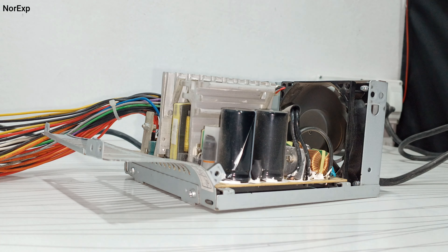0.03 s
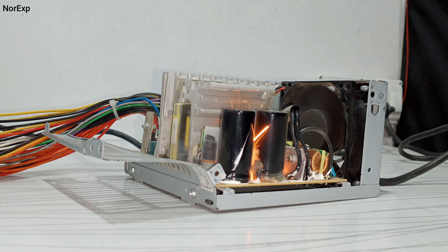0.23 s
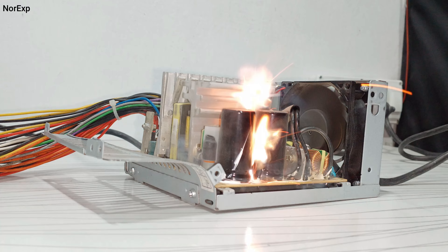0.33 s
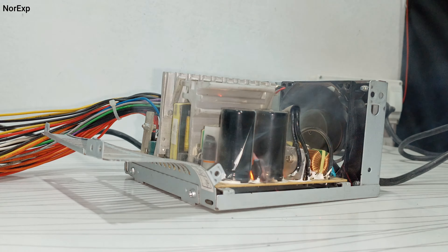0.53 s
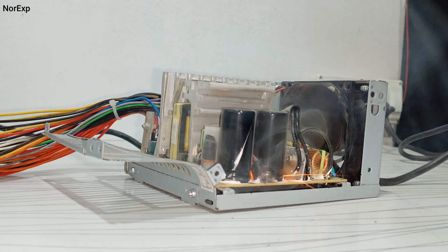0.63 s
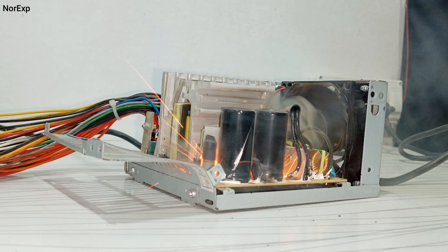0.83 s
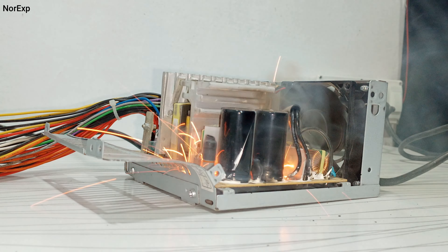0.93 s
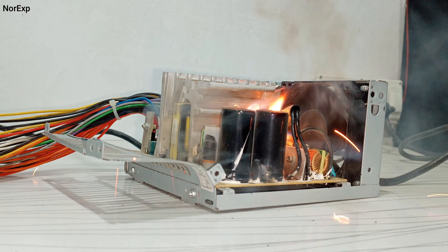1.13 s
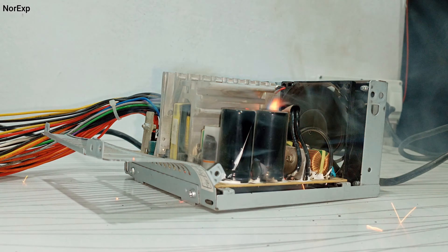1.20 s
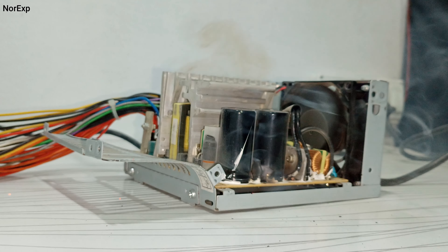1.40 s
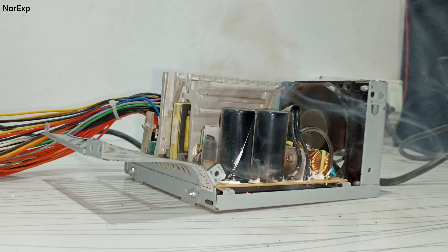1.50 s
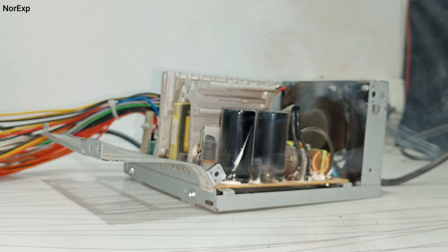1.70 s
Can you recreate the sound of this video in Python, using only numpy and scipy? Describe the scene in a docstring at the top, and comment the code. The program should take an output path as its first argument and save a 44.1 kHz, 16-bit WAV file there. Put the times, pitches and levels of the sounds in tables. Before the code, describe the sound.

Electrical bangs and a rasping arc as a power supply shorts out, hissing briefly.

```python
"""A power supply burns out

An open power supply fails on a table in a small room. Two bangs burst from it, and an arc strikes once
per mains cycle, spitting at first, then rasping as it flares. A flame flutters, hot gas whistles and
hisses out, and specks of debris tick down. The room rings on; a gain control ducks on sharp treble."""
import sys
import numpy as np
from scipy import signal
from scipy.fft import rfft, irfft, next_fast_len
from scipy.io import wavfile
from scipy.ndimage import uniform_filter1d

SR = 44100
rng = np.random.default_rng(int(sys.argv[2]) if len(sys.argv) > 2 else 0)


def generate_wav(signal):
    """Clip the signal to [-1, 1] and save it as 16-bit WAV at the path in sys.argv[1]."""
    frames = np.transpose(np.atleast_2d(signal))
    scaled = np.clip(frames, -1, 1) * 32767
    pcm = np.round(scaled).astype(np.int16)
    wavfile.write(sys.argv[1], SR, pcm)


N = 77175

# The two bangs. Each row: start, rise, hold and fall to 1/e in seconds, level in dB, tilt in dB per
# octave, room tail level in dB, tail tilt in dB per octave, tail build-up in seconds.
BANGS = [(0.227, 0.017, 0.015, 0.0087, -7.5, 0.94, -13.5, -1.05, 0.018),
         (0.5448, 0.009, 0.02, 0.018, -3.5, -0.23, -9, 1.4, 0.029)]
# Tone of the blast and of its room tail. Each row: frequency in Hz, level in dB.
BANG_COLOUR = [(24, -62), (40, -21.5), (127, -6.5), (200, -10.5), (310, -7.5), (516, -6), (1040, -5),
               (3300, -3), (4130, -5.5), (6490, -6), (11300, -23.5), (16000, -26.5)]
TAIL_COLOUR = [(35, -69), (60, -26.5), (124, -24.5), (200, -15), (290, -9), (354, -23), (492, -9),
               (749, 6.5), (6430, 4), (9130, -2.5), (10500, -24)]
# Modes of the steel case. Each row: frequency in Hz, level in dB.
CASE_MODES = [(1034, -32.5), (2186, -32), (2256, -34), (2676, -29.5), (3235, -36.5), (5238, -42.5),
              (5730, -38.5), (6438, -34.5)]
CASE_T60_S = 0.14

def bangs():
    """Each blast is a dense burst of noise that rings the case and fills the room."""
    blast, tail = 0, 0
    for start, rise, hold, fall, db, tilt_db, tail_db, tail_tilt_db, build in BANGS:
        blast += undb(db) * burst(start, rise, hold, fall, onset=0.36) * tilted(noise(), tilt_db)
        swell = np.clip((times() - start) / build, 0, 1)
        echo = np.roll(tilted(room_ring(), tail_tilt_db), int(start * SR))
        tail += undb(tail_db) * swell * echo
    case = through(undb(-12.5) * blast + undb(-16.5) * tail, ring(CASE_MODES, CASE_T60_S))
    return colour(blast, BANG_COLOUR) + colour(tail, TAIL_COLOUR) + case


# Strikes of the flaring arc, one per mains cycle. Each row: start in seconds, level in dB.
STRIKES = [(.731, -41), (.751, -40), (0.77, -36), (.793, -40), (.812, -33.5), (0.834, -35), (0.851, -34),
           (.874, -39), (0.894, -30), (0.914, -16.5), (.932, -13.5), (.951, -13), (0.971, -13.5),
           (0.9926, -9), (1.0113, -11.5), (1.031, -11), (1.0522, -11), (1.07, -9.5), (1.0904, -11),
           (1.111, -14.5), (1.1316, -14), (1.1495, -13), (1.17, -16)]
GRIT_DB, SURGE_DB, WEAK_STRIKE_DB = 1.5, 2, -21.5

def flare():
    """Tiny irregular discharges rasp and surge within each strike; weak strikes are brighter."""
    grit = noise() * undb(GRIT_DB * np.clip(walk(900), -2, 2))
    rasp = grit / grit.std() * undb(SURGE_DB * np.clip(walk(260), -2, 2))
    return sum(strike(start, db) * tilted(rasp, tilt_db=0.28 * max(WEAK_STRIKE_DB - db, 0))
               for start, db in STRIKES)


def strike(start, db):
    """Envelope of one strike: the arc burns for about half a mains cycle."""
    return undb(db) * burst(start, rise=0.00069, hold=0.00761, fall=0.0023)


# Spits of sparks. Each row: start in seconds, level in dB, tilt in dB per octave.
SPITS = [(.302, -34, 8.5), (.322, -26.5, 6.5), (.342, -21.5, 4), (0.361, -21, 4.5), (.381, -24.5, 6.5),
         (.402, -19.5, 4), (0.4202, -15, 4), (0.439, -9, 2.5), (0.459, -17, 1.5), (0.4803, -10.5, -1),
         (.500, -10, -0.5), (1.171, -15.5, -4.5)]
SPARK_GAP_S, SPARK_SCATTER_S = 0.0025, 0.0006

def spits():
    """As the arc catches, and as it snaps off, a strike breaks into a quick run of four sparks."""
    out, hiss = 0, noise()
    for start, db, tilt_db in SPITS:
        delays = np.abs(SPARK_GAP_S * np.arange(4) + SPARK_SCATTER_S * rng.standard_normal(4))
        sparks = sum(burst(start + delay, rise=1 / SR, hold=0, fall=0.0014) for delay in delays)
        out += undb(db) * sparks * tilted(hiss, tilt_db)
    return out


# Tone of the spits and of the flare. Each row: frequency in Hz, level in dB.
SPIT_COLOUR = [(180, -46), (300, -12.5), (1780, -10.5), (2930, -3), (4670, 2), (6960, -1), (7950, -10.5),
               (9240, -4.5), (10400, -17), (16000, -15)]
FLARE_COLOUR = [(150, -31.5), (400, -17), (1000, -14.5), (2000, -6), (2650, -3.5), (3500, -3), (5200, -3),
                (5900, 4.5), (7200, -3), (9400, 2.5), (11200, -13.5), (13500, -9.5), (16000, -15.5)]
# Modes of small metal parts beside the flare. Each row: frequency in Hz, level in dB.
FIN_MODES = [(3050, -3.5), (4380, -1), (5750, -1.5), (6207, -6)]

def arc(room):
    """The arc spits, then rasps; both ring nearby metal, and the room returns a duller echo."""
    spit, rasp = spits(), flare()
    spit_metal = through(spit, ring([(3750, -1.6), (4550, 2.4), (5000, 1.5)], t60=0.0072))
    fins = through(rasp, ring(FIN_MODES, t60=0.043))
    spit, rasp = colour(spit, SPIT_COLOUR), colour(rasp, FLARE_COLOUR)
    echo = through(undb(-10.5) * spit + undb(-12) * rasp, room)
    return spit + rasp + undb(-2.5) * spit_metal + undb(-9) * fins + tilted(echo, tilt_db=-1)


# Low pops in the first bang, the last early spits and the arc's final snap.
# Each row: start in seconds, relative level in dB, thump pitch in Hz.
POPS = [(.24, -2, 323), (0.4847, -2, 240), (.5, 4.5, 520), (0.505, -13.5, 148), (1.157, -11.5, 245),
        (1.172, -2.5, 756), (1.1759, -9, 337)]
# Tone of the pulse and its rattle. Each row: frequency in Hz, level in dB.
POP_COLOUR = [(30, -25), (70, -2), (150, 0.5), (800, 2), (2400, -5), (5000, -26), (16000, -60)]
THUMP_FALL_CYCLES, RATTLE_FALL_S = 0.63, 0.0028

def pops():
    """Suddenly heated air gives a pressure pulse, a low thump and a short rattle behind it."""
    pulses, thumps = np.zeros(N), 0
    for start, db, hz in POPS:
        pulses[int(start * SR)] += undb(db + 7)
        cycles = hz * np.maximum(times() - start, 0)
        thumps += undb(db - 5.5) * np.sin(2 * np.pi * cycles) * np.exp(-cycles / THUMP_FALL_CYCLES)
    rattle = through(pulses, noise() * np.exp(-times() / RATTLE_FALL_S))
    return colour(pulses + undb(-1) * rattle, POP_COLOUR) + filtered(thumps, "highpass", hz=80)


# The whistling vent. Each row: time in seconds, pitch in Hz, gain on the airflow in dB.
WHISTLE = [(1.0, 2700, -10), (1.095, 2600, -10.5), (1.138, 2700, -4), (1.157, 2575, -2.5), (1.175, 3002, 1),
           (1.219, 3050, -1), (1.299, 3194, -4)]
WHISTLE_WANDER_HZ, WHISTLE_LAG_S = 120, 0.003

def whistle():
    """A breathy, shifting resonance, blown in puffs by the last strikes and by the escaping gas."""
    seconds, hz, db = np.array(WHISTLE).T
    lag = np.exp(-times() / WHISTLE_LAG_S)
    strikes = sum(strike(start, strike_db) for start, strike_db in STRIKES)
    puffs = signal.fftconvolve(strikes, lag / lag.sum())[:N]
    push = (puffs + undb(-6) * fader(GAS_LEVEL)) * fader(np.column_stack([seconds, db]))
    pitch = np.interp(times(), seconds, hz) + WHISTLE_WANDER_HZ * walk(500)
    return push * walk(380) * sine(pitch)


# Swells of escaping gas. Each row: time in seconds, level in dB.
GAS_LEVEL = [(.89, -39), (.96, -16.5), (1.03, -25), (1.12, -43), (1.19, -23), (1.27, -20), (1.32, -29.5),
             (1.38, -47), (1.47, -75)]
# Tone of the hiss. Each row: frequency in Hz, level in dB.
GAS_COLOUR = [(60, -40), (113, -36), (156, -12.5), (294, -18), (500, -17), (1000, -13), (1600, -15.5),
              (2200, -10.5), (3120, -12), (3850, -16), (6280, -8.5), (13600, -29)]
GAS_FLUTTER_DB, GAS_COOLS_AT_S, GAS_COOLING_S = 1.5, 1.172, 0.11

def gas():
    """Hot gas escapes in a fluttering hiss that dulls as it dies."""
    hiss = fader(GAS_LEVEL) * undb(GAS_FLUTTER_DB * walk(110)) * colour(noise(), GAS_COLOUR)
    heat = np.exp(-np.maximum(times() - GAS_COOLS_AT_S, 0) / GAS_COOLING_S)
    return heat * hiss + (1 - heat) * filtered(hiss, "lowpass", hz=3240)


# Level of the low roar: lingers after the bangs, dips briefly, swells with the flame. Each row: time in
# seconds, level in dB.
ROAR_LEVEL = [(.25, -24), (.32, -30.5), (.43, -30), (.47, -53), (.62, -37.5), (.76, -32), (.87, -30),
              (1.0, -23), (1.06, -38), (1.13, -45)]
# Tone of the roar, and modes of the air in the case. Each row: frequency in Hz, level in dB.
ROAR_COLOUR = [(30, -34), (70, -24), (150, -4), (290, -0.5), (430, -0.5), (650, -2), (1100, -7.5),
               (2200, -20), (6000, -11.5), (11000, -19.5)]
HOLLOW_MODES = [(247.6, -44), (301.5, -46.5), (398.4, -43), (452.2, -41), (594, -42.5), (646.0, -44),
                (829.0, -47.5)]
ROAR_FLUTTER_DB = 1

def low_roar():
    """A fluttering roar after the bangs and in the flame, with the hollow ring of air in the case."""
    roar = undb(ROAR_FLUTTER_DB * walk(70.2)) * colour(noise(), ROAR_COLOUR)
    hollow = through(noise(), ring(HOLLOW_MODES, t60=0.21))
    return fader(ROAR_LEVEL) * (undb(-4) * roar + undb(-2) * hollow)


# Swells of the low ring. Each row: time in seconds, level in dB.
BOOM_LEVEL = [(.23, -40), (.27, -43), (.36, -44), (.44, -59), (.6, -37.5), (.75, -45.5), (.88, -43.5),
              (1.1, -49), (1.22, -49), (1.283, -31.5), (1.38, -48.5), (1.5, -74)]
BOOM_HZ, BOOM_WANDER_HZ = 158.6, 4.96

def boom():
    """A low, wavering resonance swells after each outburst."""
    return fader(BOOM_LEVEL) * np.sqrt(2) * sine(BOOM_HZ + BOOM_WANDER_HZ * walk(25))


# Falling specks. Each row: start in seconds, level in dB, fall to 1/e in seconds,
# send to room and case in dB, tilt in dB per octave.
TICKS = [(1.343, -37, 0.00016, -21, -6.5), (1.4085, -45.5, 0.00063, -25, 17),
         (1.435, -42.5, 0.0024, -10, 1), (1.464, -46, 0.00066, -18, 11), (1.487, -35.5, 0.015, -7, 2.5)]
# Tone of the ticks. Each row: frequency in Hz, level in dB.
TICK_COLOUR = [(200, -7), (700, 6.5), (1500, -28), (3200, 4), (5000, -6.5), (8000, 1.5), (11000, -16.5),
               (16000, -24)]

def debris(room):
    """Specks land with short ticks that ring the case and the room."""
    direct, send = 0, 0
    for start, db, fall, send_db, tilt_db in TICKS:
        tick = undb(db) * burst(start, rise=0.00026, hold=0.00034, fall=fall) * tilted(noise(), tilt_db)
        direct += tick
        send += undb(send_db) * tick
    case = through(send, ring(CASE_MODES, CASE_T60_S))
    return colour(direct + through(send, room), TICK_COLOUR) + case


# Reverb of the small room. Each row: frequency in Hz, time to fall 60 dB in seconds.
ROOM_T60 = [(100, 0.92), (400, 0.94), (1500, 0.84), (4000, 0.67), (8000, 0.46), (16000, 0.34)]

def room_ring():
    """Diffuse room response, starting at rms 1; the treble dies first."""
    hz, t60s = np.array(ROOM_T60).T
    spectrum = rfft(noise())
    log_hz = np.log(np.maximum(np.arange(len(spectrum)) * SR / N, 1))
    bands = [irfft(spectrum * np.interp(log_hz, np.log(hz), share), N) for share in np.eye(len(hz))]
    return sum(band * decay(t60) for band, t60 in zip(bands, t60s))


# Level of the background. Each row: time in seconds, level in dB.
AIR_LEVEL = [(0, -59.5), (.05, -59), (.12, -69), (.2, -65.5), (1.3, -45.5), (1.55, -52.5), (1.75, -55.5)]
# Tone of the background. Each row: frequency in Hz, level in dB.
AIR_COLOUR = [(25, -35.5), (60, -15.5), (160, -14.5), (200, -7), (330, -6), (480, -10.5), (1500, -16.5),
              (5300, -24), (9000, -23.5), (10200, -38.5)]

def room_tone():
    """A faint bed of noise that swells under the burnout and eases off."""
    return fader(AIR_LEVEL) * colour(noise(), AIR_COLOUR)


def undb(db):
    """Decibels to gain."""
    return 10 ** (np.asarray(db) / 20)


def times():
    """Time of every sample in seconds."""
    return np.arange(N) / SR


def noise():
    """White noise, rms 1."""
    return rng.standard_normal(N)


def sine(hz):
    """Sine wave that follows a pitch curve."""
    return np.sin(2 * np.pi * np.cumsum(hz) / SR)


def walk(rate):
    """Random wobble with a spread near 1, gliding to `rate` new values a second."""
    return 1.18 * np.interp(times() * rate, np.arange(N), noise())


def fader(points):
    """Gain along (s, dB) points, dying away outside them."""
    seconds, db = np.array(points).T
    t = times()
    outside = np.maximum(seconds[0] - t, 0) + np.maximum(t - seconds[-1], 0)
    return undb(np.interp(t, seconds, db)) * np.exp(-outside * 200)


def burst(start, rise, hold, fall, onset=0):
    """Envelope timed in seconds: a jump to the onset share, rise, hold, exponential fall."""
    age = times() - start
    attack = (age >= 0) * (onset + (1 - onset) * np.clip(age / rise, 0, 1))
    return attack * np.exp(-np.maximum(age - rise - hold, 0) / fall)


def decay(t60):
    """Envelope that falls 60 dB in t60 seconds."""
    return np.exp(-np.log(1000) * times() / t60)


def ring(modes, t60):
    """Response of (Hz, dB) modes that die away together."""
    tones = sum(undb(db) * np.sin(2 * np.pi * (hz * times() + rng.random())) for hz, db in modes)
    return tones * decay(t60)


def through(x, response):
    """Pass a sound through a response scaled to unit energy."""
    return signal.fftconvolve(x, response / np.linalg.norm(response))[:N]


def filtered(x, kind, hz, order=2):
    """Plain lowpass or highpass filter."""
    return signal.sosfilt(signal.butter(order, hz, kind, fs=SR, output="sos"), x)


def colour(x, points):
    """Causal equaliser of unit power through (Hz, dB) points."""
    size = 2 ** 17
    octave = np.log2(np.maximum(np.arange(size // 2 + 1) * SR / size, 1))
    hz, db = np.array(points).T
    gain = undb(np.interp(octave, np.log2(hz), db))
    cepstrum = irfft(np.log(gain / np.sqrt(np.mean(gain ** 2))))
    cepstrum[1:size // 2] *= 2  # minimum phase: nothing rings ahead of a hit
    cepstrum[size // 2 + 1:] = 0
    return irfft(rfft(x, size) * np.exp(rfft(cepstrum)))[:N]


def tilted(x, tilt_db):
    """Brighten or darken a sound about 5 kHz, in dB per octave."""
    size = next_fast_len(N)
    octave = np.log2(np.clip(np.arange(size // 2 + 1) * SR / size, 1000, 16000) / 5000)
    return irfft(rfft(x, size) * undb(tilt_db * octave), size)[:N]


def scene():
    """All sources over the quiet room, in mono."""
    room = room_ring() * np.clip(times() / 0.0043, 0, 1)  # the echo takes a moment to build
    electrical = bangs() + arc(room) + pops()
    burning = whistle() + gas() + low_roar()
    return (electrical + burning + boom() + debris(room) + room_tone())[None]


DUCK_ABOVE_DB, DUCK_SLOPE, DUCK_RELEASE_S, CEILING = -35, 0.34, 0.081, 1.1

def record(dry):
    """Sharp treble turns the gain down for a moment; peaks are rounded and the top is cut."""
    treble = filtered(dry, "highpass", hz=11400, order=4)
    treble_rms = np.sqrt(np.abs(uniform_filter1d(treble ** 2, size=200)))
    release = np.exp(times() / DUCK_RELEASE_S)
    held = np.maximum.accumulate(treble_rms * release, axis=-1) / release  # catch peaks, let them sink
    ducked = dry * np.maximum(held / undb(DUCK_ABOVE_DB), 1) ** -DUCK_SLOPE
    rounded = CEILING * np.tanh(ducked / CEILING)
    return signal.sosfilt(signal.ellip(10, 0.2, 80, 16000, fs=SR, output="sos"), rounded)


dry = scene()
out = record(dry)
generate_wav(out)
```